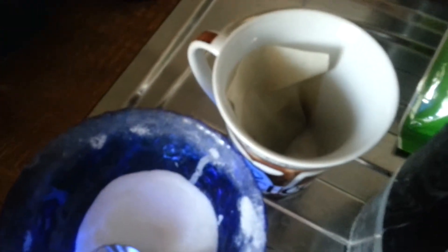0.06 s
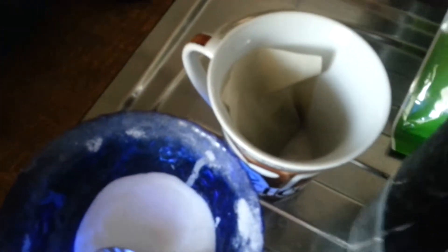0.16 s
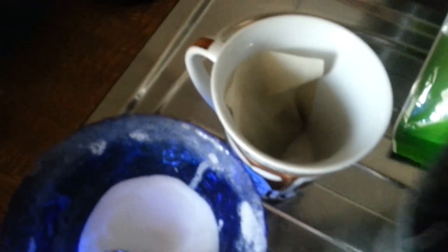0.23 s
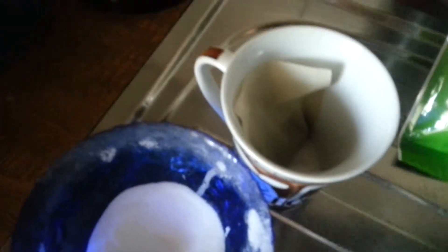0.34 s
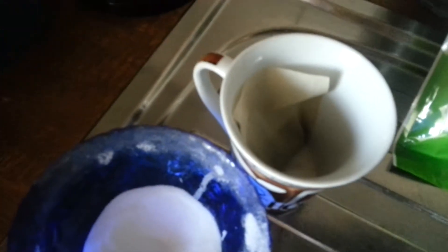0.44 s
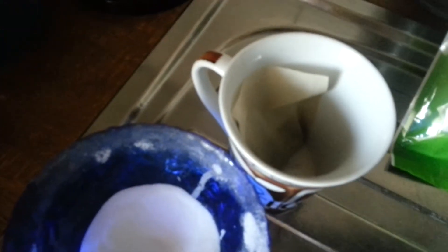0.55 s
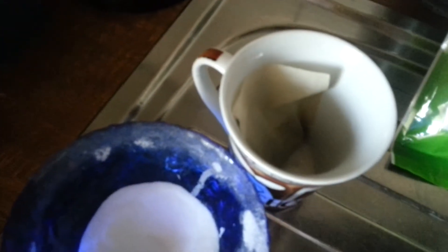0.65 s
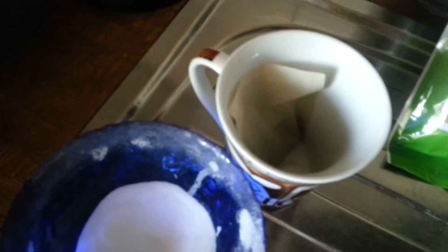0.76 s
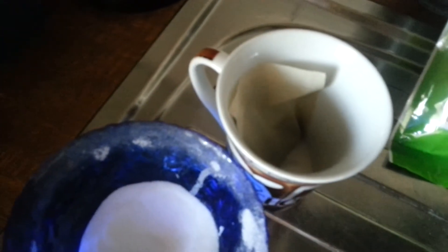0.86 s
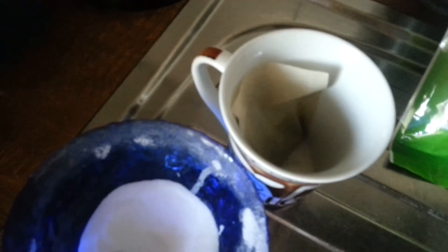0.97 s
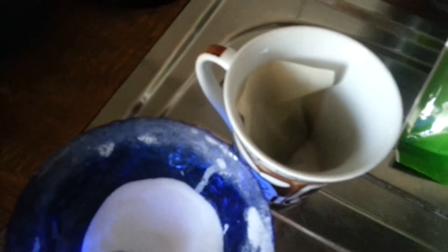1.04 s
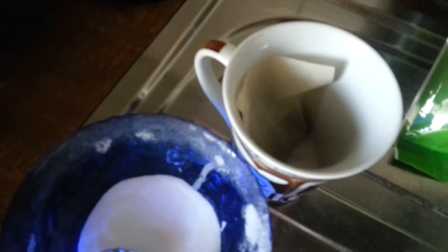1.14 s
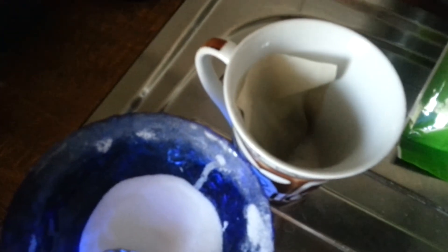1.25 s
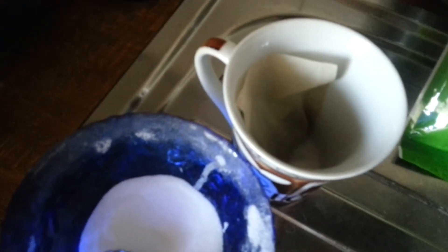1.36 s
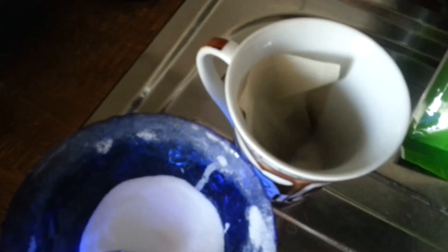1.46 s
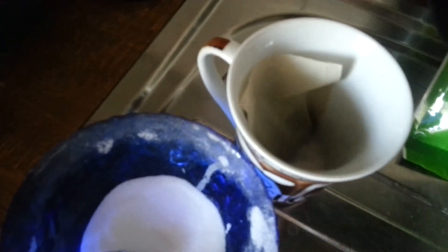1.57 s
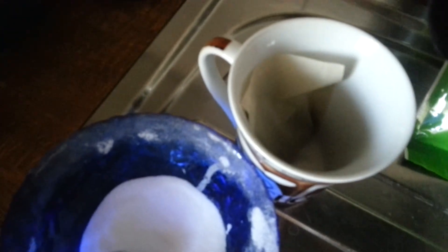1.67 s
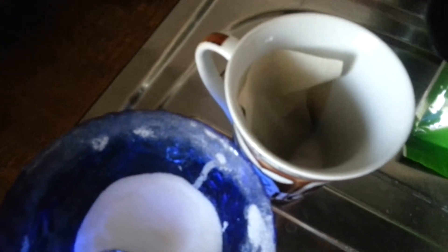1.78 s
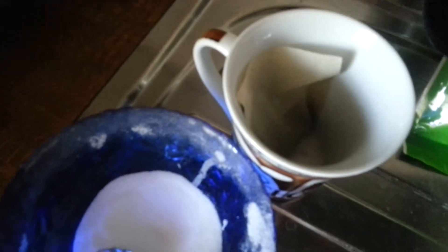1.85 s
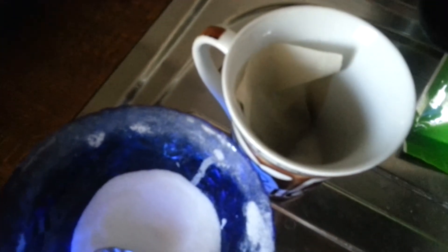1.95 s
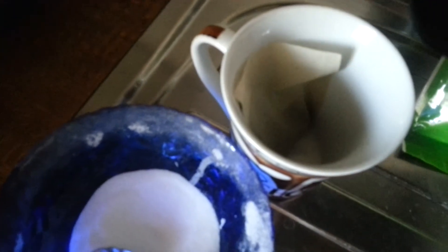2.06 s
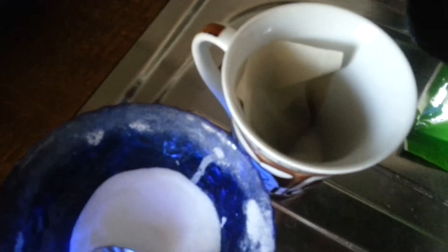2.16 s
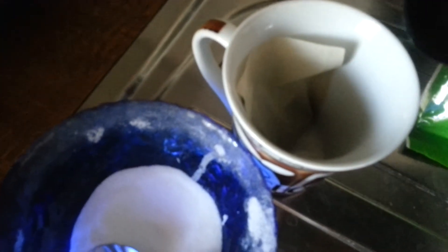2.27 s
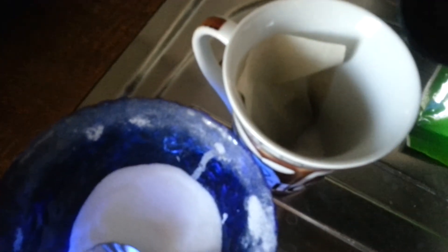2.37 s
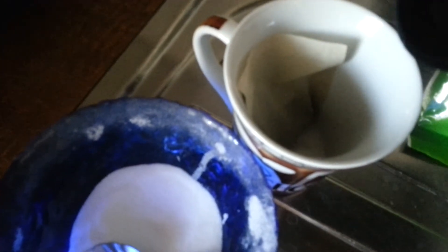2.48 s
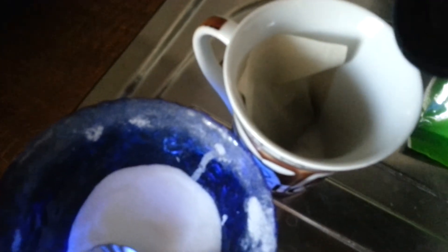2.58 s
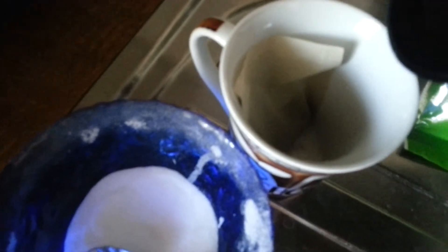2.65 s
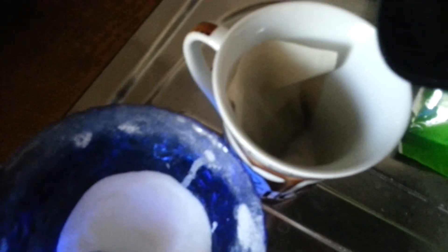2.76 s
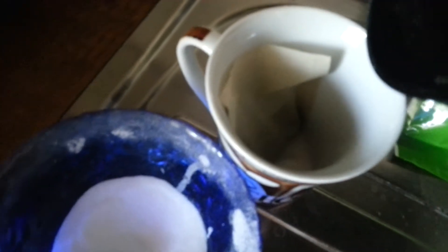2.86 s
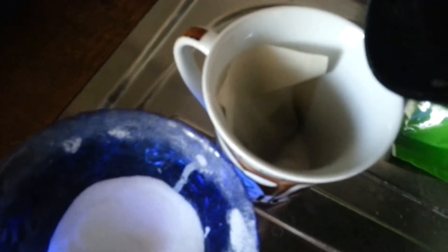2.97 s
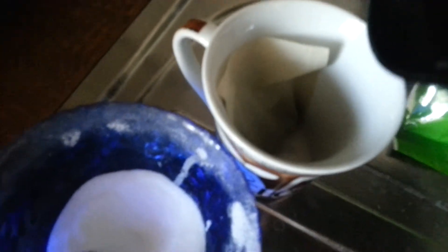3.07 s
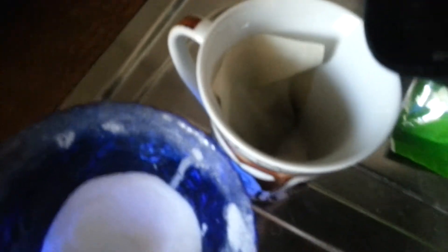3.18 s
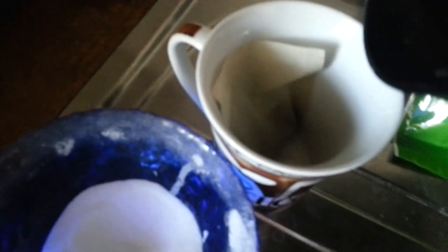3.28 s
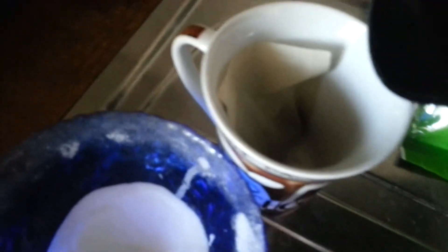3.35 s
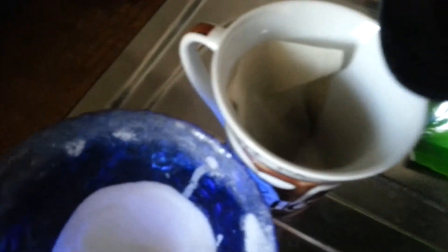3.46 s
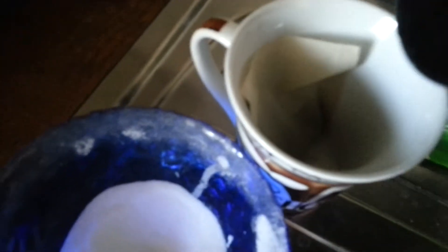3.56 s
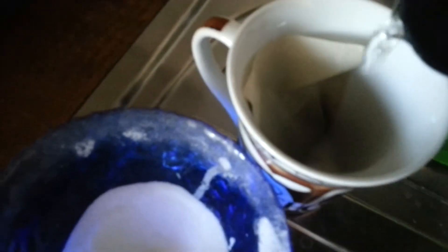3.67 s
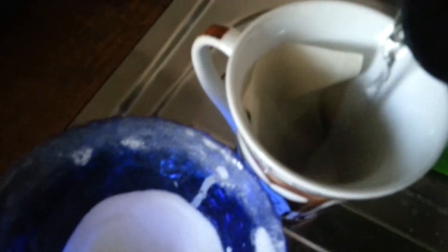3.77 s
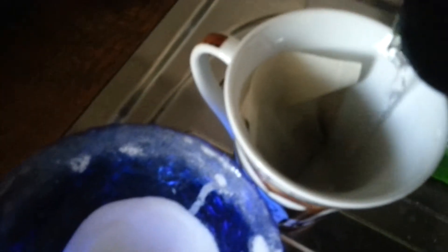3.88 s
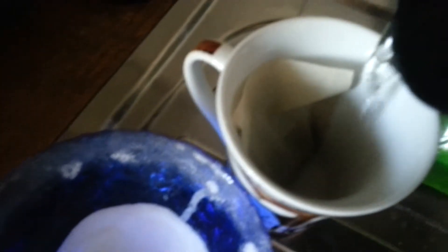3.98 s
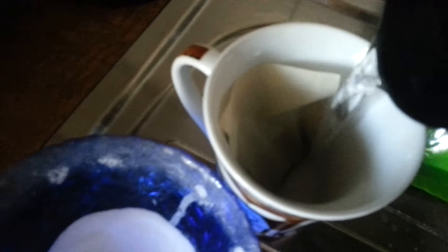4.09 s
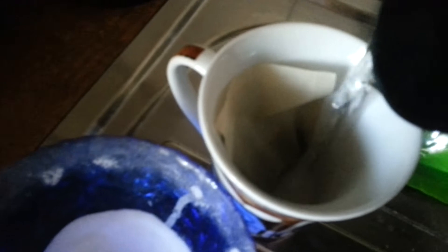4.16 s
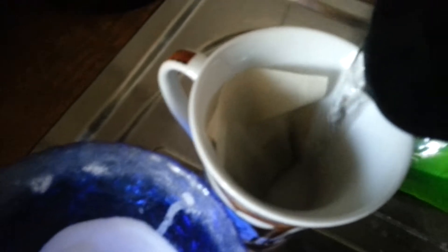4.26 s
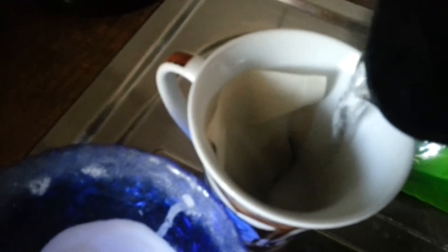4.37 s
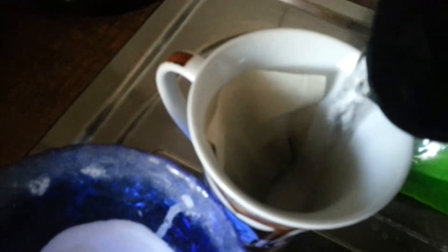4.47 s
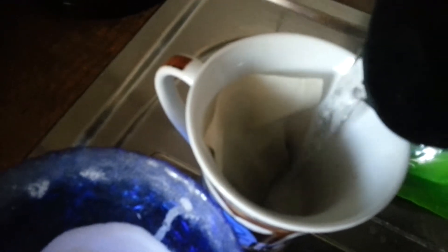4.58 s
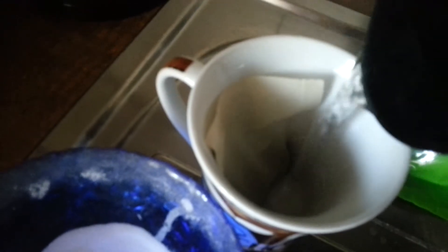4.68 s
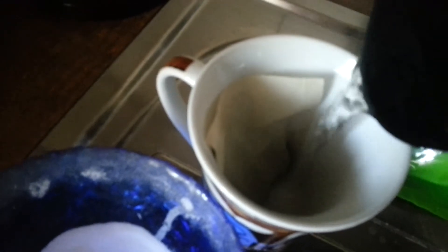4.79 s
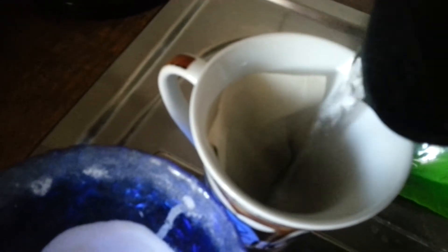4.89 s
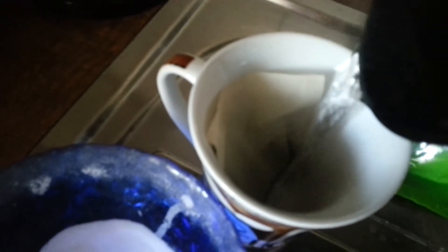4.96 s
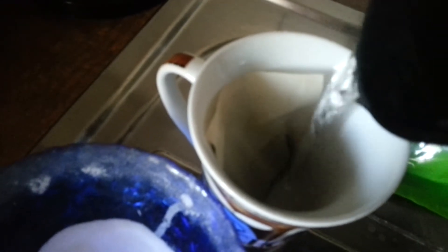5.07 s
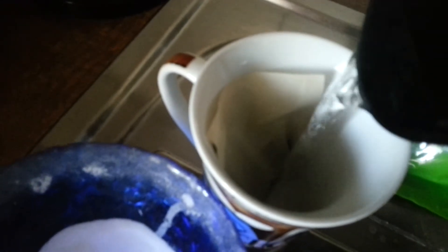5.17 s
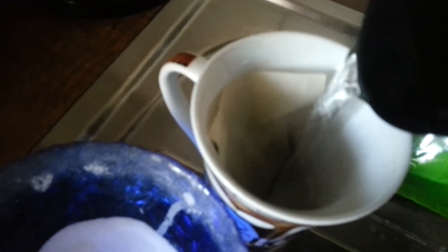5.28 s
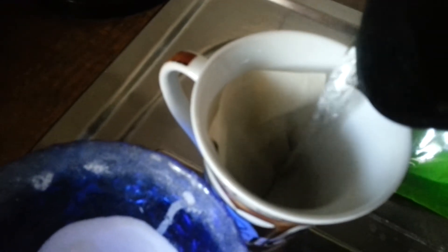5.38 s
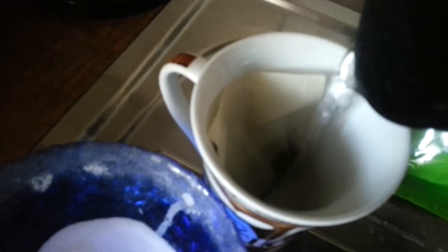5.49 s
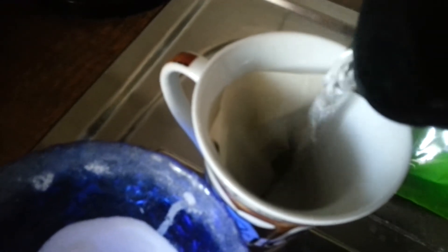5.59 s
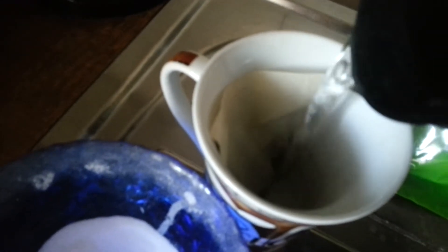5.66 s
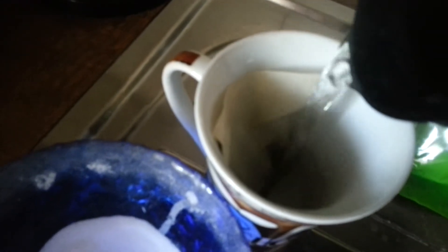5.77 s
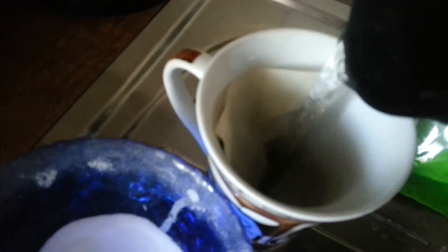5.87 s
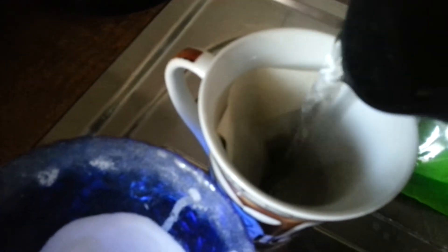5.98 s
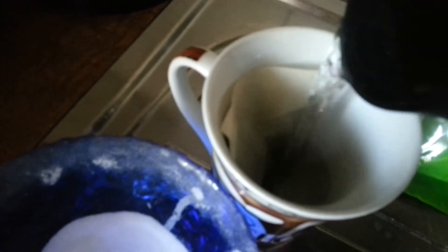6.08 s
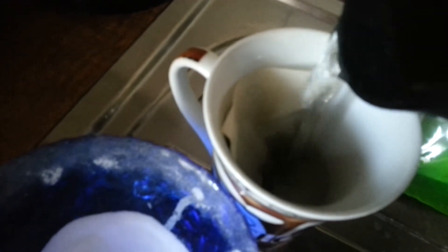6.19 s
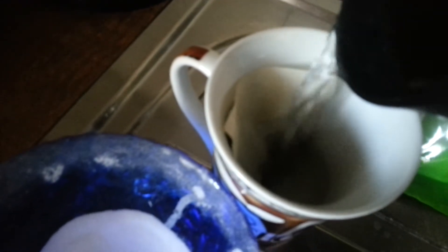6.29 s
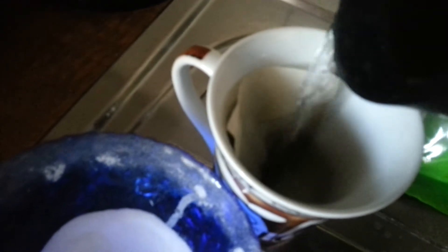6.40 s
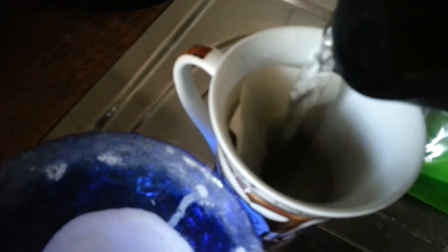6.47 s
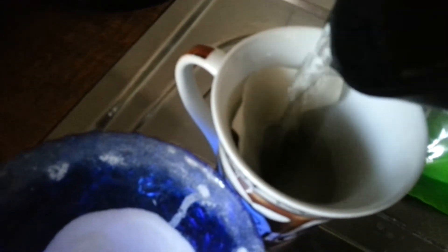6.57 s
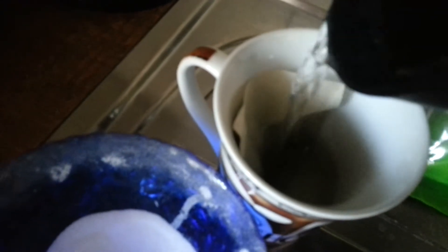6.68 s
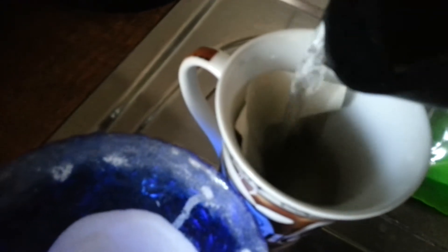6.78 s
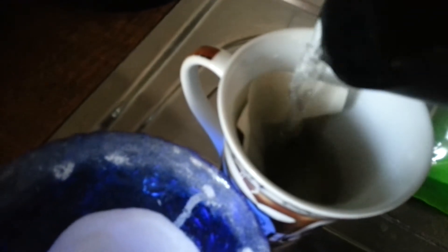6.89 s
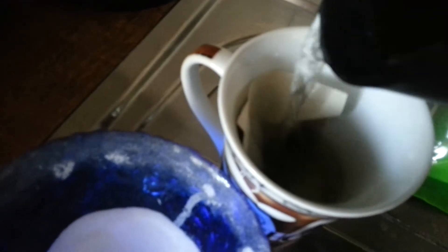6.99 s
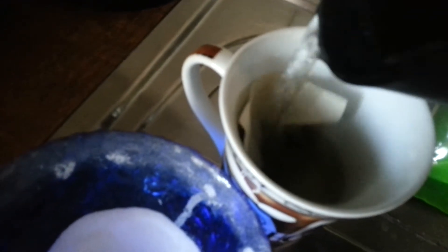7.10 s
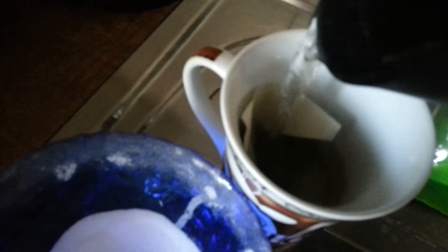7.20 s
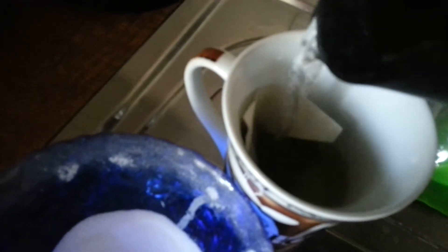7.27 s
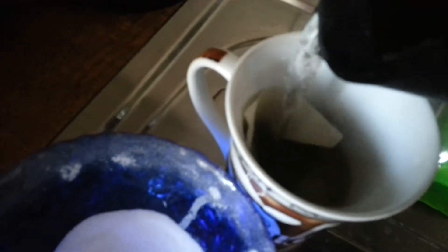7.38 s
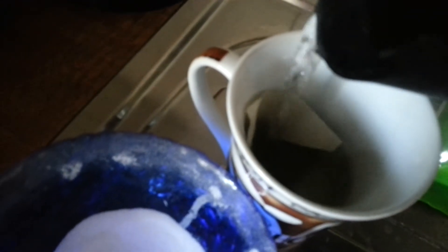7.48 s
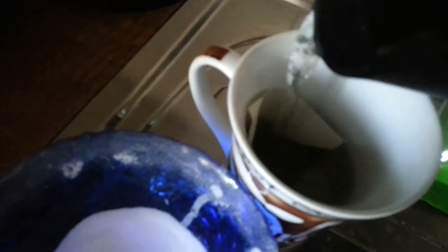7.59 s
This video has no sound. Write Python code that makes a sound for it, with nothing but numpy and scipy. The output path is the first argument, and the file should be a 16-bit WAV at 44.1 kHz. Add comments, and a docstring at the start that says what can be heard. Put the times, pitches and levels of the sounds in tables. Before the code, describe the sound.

A close handheld stereo microphone in a small, quiet kitchen. At 0 s a hot kettle rumbles and rushes; light touches lead to a hard hollow plastic clunk with rattling around 0.2 s and a brief scrape at 0.3 s. The simmer dies away within about a second, with a very faint squeak near 0.7 s and a soft swill at 1 s. Lone knocking pops and dry ticks become sparser until 3.6 s, one stronger at 2.7 s. At 3.8 s water reaches the ceramic mug, right of centre, in bright, uneven splashes and fizz. From 4.7 s it runs fuller; by 5.4 s a pool forms, hollow plops and gurgling mix with the splashes, and the mug's note slowly rises. The flow weakens after 6.5 s, with low glugs near 6.6, 6.95 and 7.5 s, then strengthens again at the end, still pouring. Steel board resonance and short reflections surround it.

```python
"""A hot electric kettle is lifted with a hollow clunk; its rushing simmer dies away and it ticks as it cools.
Then water runs down the wall of a ceramic mug onto a tea bag: every splash ticks, traps a small bubble and
rings the air in the mug, whose note rises as it fills; air glugs from under the tea bag.
A small kitchen, heard by the stereo microphones of a hand-held camera just left of the mug."""
import sys
import numpy as np
from scipy import signal
from scipy.fft import rfft, irfft, next_fast_len
from scipy.io import wavfile

SR = 44100
rng = np.random.default_rng(int(sys.argv[2]) if len(sys.argv) > 2 else 0)


def to_wav(sig):
    """Store sig (one row per channel, or 1-D mono) as 16-bit WAV at the path in sys.argv[1].

    Samples outside -1..1 are clipped; the rate is SR.
    """
    pcm = np.clip(np.atleast_2d(sig), -1, 1) * 32767
    pcm = np.round(pcm).astype(np.int16)
    wavfile.write(sys.argv[1], SR, pcm.T)  # frames by channels


N = 336919
TIME = np.arange(N) / SR
RING = np.arange(8192) / SR  # time axis of a ring, 0.19 s
SHORT = np.arange(2048) / SR  # time axis of a splash or pop, 0.046 s

# strength of the stream as the kettle is tipped more or less: start_s, level_db
STREAM_LEVEL = [(3.779, -50), (4.0, -59.5), (4.25, -47.5), (4.55, -50), (4.8, -43), (5.7, -42.5),
                (5.92, -46), (6.15, -42.5), (6.77, -54.5), (6.921, -48.5), (7.3, -56.5), (7.63, -43.5)]

POUR_S, POOL_S = 3.78, 5.44  # the first water arrives; the soaked tea bag lets a pool form
EMPTY_HZ, RISE_HZ_PER_S = 908, 43  # the air in the mug, shorter as it fills
AIR_T60_S = .016  # of the air in the mug and of the air above the kettle's water
DROP_HZ = 2370  # bubble pitch of a middling drop
THUMP_DB_PER_OCT, TICK_DB_PER_OCT = -3, -1  # a smaller drop rings higher; both fall, the thump faster
TICK_DB = -12  # impact tick over bubble, for a middling drop
TICK_TOP_HZ = 9100  # the brightest tick, on bare glaze
TOP_HZ = 14700  # the camera's treble limit
RUMBLE_DB, RUMBLE_FALL_DB_PER_S = -43, 23.5  # the simmer dies once the heat is off
RUSH_DB, RUSH_FALL_DB_PER_S = -47, 11
SWILL_S, SWILL_LENGTH_S, SWILL_DB = 1, 0.14, -57.5  # water swills over the element as the kettle is carried
TIPPING_S, TIPPED_RUMBLE_DB = 0.32, -62.5  # the water takes this long to shift
REST_RUSH_DB, TIPPED_RISE_DB_PER_S = -63, 2  # the rush lingers, and revives as the kettle tips


def undb(db):
    """Decibels to gain."""
    return 10 ** (np.asarray(db) / 20)


def curves(table, t=TIME):
    """The columns of a table of timed rows, joined by straight lines."""
    s, *columns = np.transpose(table)
    return [np.interp(t, s, c) for c in columns]


def unit(x):
    """Scale to rms 1."""
    return x / np.sqrt(np.mean(x ** 2))


def fade(t, t60):
    """Exponential decay, 60 dB in t60 seconds."""
    return np.exp(-np.log(1000) * t / t60)


def add(out, s, sound):
    """Mix a sound into a track at s seconds."""
    i = int(np.clip(s * SR, 0, N - 1))
    out[..., i:i + sound.shape[-1]] += sound[..., :N - i]


def colour(x, points):
    """Shape a noise with a (Hz, dB) spectrum; rms 1."""
    n = x.shape[-1]
    size = next_fast_len(n)
    hz, db = np.transpose(points)
    f = np.maximum(np.fft.rfftfreq(size, 1 / SR), 1)
    gain = undb(np.interp(np.log(f), np.log(hz), db))
    gain = gain * np.minimum(f / hz[0], 1)  # falls away below the first point
    return unit(irfft(rfft(x, size) * gain, size)[..., :n])


def highpass(x, hz, order=2):
    """Take out what lies under hz."""
    return signal.sosfilt(signal.butter(order, hz, "high", fs=SR, output="sos"), x)


def spread(pair, wide_hz):
    """Two unrelated signals to left and right: partly alike in the upper bass, unrelated above wide_hz."""
    band = signal.butter(1, [100, max(wide_hz, 200)], "bandpass", fs=SR, output="sos")
    side = pair[1] - .7 * signal.sosfilt(band, pair[1])
    return unit(np.array([pair[0] + side, pair[0] - side]))


def pan(x, right_db):
    """Make the right side louder than the left by right_db."""
    return x * undb(np.array([[-right_db], [right_db]]) / 2)


def grains(rate, scatter_db):
    """Two unrelated trains of dense clicks of very uneven size, rate per second."""
    size = undb(scatter_db * np.minimum(rng.exponential(size=(2, N)), 4))
    clicks = rng.random((2, N)) < rate / SR
    return clicks * size * rng.standard_normal((2, N))


def resonate(x, modes):
    """What a set of (Hz, t60, dB) modes picks out of a stereo sound."""
    response = np.zeros(len(RING))
    for hz, t60, db in modes:
        peak = undb(db) * 2 * np.log(1000) / (t60 * SR)  # narrow modes would otherwise come out louder
        response += peak * np.cos(2 * np.pi * hz * RING) * fade(RING, t60)
    return signal.fftconvolve(x, response[None], axes=1)[:, :N]


def bubble(hz, cycles, glide):
    """A trapped bubble rings for a few cycles, its pitch creeping up by the share glide."""
    age = SHORT * hz / cycles
    phase = 2 * np.pi * hz * np.cumsum(1 + glide * np.minimum(age, 1)) / SR
    return np.sin(phase) * fade(age, 0.73)


def simmer_levels():
    """Gains of rumble and rush: both fade with the heat; tipping washes water over the hot element again."""
    tipped_s = np.maximum(TIME - POUR_S, 0)
    cooling_rumble = undb(RUMBLE_DB - RUMBLE_FALL_DB_PER_S * TIME)
    tipped_rumble = undb(TIPPED_RUMBLE_DB) * np.minimum(tipped_s / TIPPING_S, 1)
    swill = undb(SWILL_DB) * np.exp(-((TIME - SWILL_S) / SWILL_LENGTH_S) ** 2)
    rumble = np.hypot(np.hypot(cooling_rumble, tipped_rumble), swill)
    cooling_rush = undb(RUSH_DB - RUSH_FALL_DB_PER_S * TIME)
    rush = np.hypot(cooling_rush, undb(REST_RUSH_DB + TIPPED_RISE_DB_PER_S * tipped_s))
    return rumble, rush


def simmer(lumps_db=1.5, hollow_hz=915, hiss_db=-10):
    """Steam bubbles collapse in flurries: a rumble in the water, a rush in the walls, a hollow note; steam hisses."""
    # colour of the rumble in the water: pitch_hz, level_db
    rumble_colour = [(100, -60), (170, 1.5), (235, -3), (350, 7), (520, -6.5), (700, 0.5), (2000, -79)]
    # colour of the rush in the walls: pitch_hz, level_db
    rush_colour = [(300, -34), (800, -6.5), (1700, -13), (2700, -16.5), (4200, -19.5), (7000, -34)]
    # once off its base, the air above the water sings along: start_s, level_db
    hollow_level = [(.33, -43.5), (.72, -54.5), (.9, -102)]
    rumble, rush = simmer_levels()
    beats = np.arange(0, N / SR, 1 / 40)  # seconds
    flurry = undb(lumps_db * np.interp(TIME, beats, rng.standard_normal(len(beats))))
    low = spread(colour(grains(rate=680, scatter_db=3.0), rumble_colour), 540) * rumble
    collapses = spread(colour(grains(rate=2400, scatter_db=-1.5), rush_colour), 640)
    hollow = unit(resonate(collapses, [(hollow_hz, AIR_T60_S, 0)]))
    hollow = hollow * undb(curves(hollow_level)[0]) * (TIME > hollow_level[0][0])
    hiss = undb(hiss_db) * highpass(rng.standard_normal((2, N)), 5500)
    return flurry * low + hollow + pan((flurry * collapses + hiss) * rush, 3.9)


def knocks(rattle_db=-6, rattle_t60=0.082, give_s=0.00021, low_hz=150):
    """Each contact rings the water-filled body and rattles the plastic; the foot scrapes as it leaves the base."""
    # kettle against its base, and its handle and lid: start_s, level_db, rattle_db (relative to the knock)
    contacts = [(.013, -44, 14), (.112, -39, -16.5), (.1715, -26, -2.5), (0.1754, -22.5, 2),
                (.1797, -21.5, -8), (.1826, -13, -5), (.198, -25, 0.5), (0.2156, -29, 5), (.288, -31, -8),
                (2.682, -46.5, 9.5), (4.1519, -45.5, 17)]
    # what the kettle's body rings with: pitch_hz, t60_s, level_db
    body_modes = [(123.4, 0.34, -24), (243, 0.32, -22.5), (441.5, 0.15, -15.5), (554, 0.067, -9),
                  (702, 0.065, 0.5), (820, 0.09, -13.5), (1170, 0.11, -15), (2940, 0.026, -24)]
    # colour of its plastic parts rattling and scraping: pitch_hz, level_db
    rattle_colour = [(150, -4), (900, 1.5), (1600, 5.5), (2700, -0.5), (3700, -8), (6000, -22),
                     (15000, -38)]
    # the kettle drags off its base: start_s, level_db
    scrape_level = [(.225, -52), (.278, -30.5), (.296, -32), (.315, -38.5), (.34, -54)]
    body = sum(undb(db) * np.sin(2 * np.pi * hz * RING) * fade(RING, t60) for hz, t60, db in body_modes)
    loose = fade(RING, rattle_t60) * (1 - np.exp(-RING / give_s))  # the plastic gives before it rattles
    thud, shake = np.zeros(N), np.zeros(N)
    for s, db, loose_db in contacts:
        add(thud, s, undb(db) * body)
        add(shake, s, undb(db + loose_db + rattle_db) * loose)
    dragging = (TIME > scrape_level[0][0]) * (TIME < scrape_level[-1][0])
    drag = undb(curves(scrape_level)[0]) * dragging
    rattle = spread(colour(rng.standard_normal((2, N)), rattle_colour), 850) * (shake + drag)
    return highpass(thud + pan(rattle, 4.2), low_hz, order=4)


def plops(count=60, start_s=.33, mean_s=.42, first_db=-35, fall_db_per_s=10, scatter_db=3.0, hz=1150,
          pitch_spread=.5):
    """Lone collapses grow rarer and weaker as the lifted kettle cools; rows of start_s, level_db, pitch_hz."""
    age = rng.exponential(mean_s, count)
    size, pitch = rng.standard_normal((2, count))
    db = first_db - fall_db_per_s * age + scatter_db * size
    return np.column_stack([start_s + age, db, hz * np.exp(pitch_spread * pitch)])


def pops(crack_db=-10, length_s=.03):
    """Short pitched knocks with a dry crack: the last lone collapses of steam, and once the kettle's body under
    a knock."""
    # the loudest ticks of the hot kettle, mostly steam bubbles collapsing; the row at 2.682 s is the body
    # ringing under a knock: start_s, level_db, pitch_hz
    loud_ticks = [(.53, -33, 1780), (0.832, -40, 1720), (1.082, -35, 1630), (1.355, -41, 1650),
                  (1.421, -38, 725), (1.452, -35.5, 754), (1.739, -42, 1580), (1.851, -37.5, 784),
                  (2.028, -37.5, 1610), (2.213, -36, 760), (2.604, -40.5, 1380), (2.682, -30, 1000),
                  (3.299, -43, 1730), (3.607, -43.5, 1700)]
    # colour of their dry crack: pitch_hz, level_db
    crack_colour = [(250, -20.5), (750, -3), (1200, -6.5), (1700, 0), (2700, -11.5), (4500, -25),
                    (15000, -24)]
    out = np.zeros((2, N))
    for s, db, hz in np.vstack([loud_ticks, plops()]):
        crack = spread(colour(rng.standard_normal((2, len(SHORT))), crack_colour), 900)
        crack = crack * fade(SHORT, length_s)
        knock = .5 * bubble(hz, hz * length_s, 0)  # steady pitch
        add(out, s, undb(db) * (knock + undb(crack_db) * crack))
    return pan(out, 3.1)


def squeak(at_s=0.684, length_s=0.077, hz=4230, t60=0.011, db=-61):
    """The plastic handle squeaks faintly as it takes the weight: noise rubbed through one narrow resonance."""
    rub = unit(resonate(rng.standard_normal((2, N)), [(hz, t60, 0)]))
    return undb(db) * rub * np.exp(-((TIME - at_s) / length_s) ** 2)


def droplets(count=720, drop_db=-1.5, scatter_db=6.0, pitch_hz=2200, glance_oct_per_db=0.24,
             pitch_spread=0.53, small_db_per_oct=-4.5, thinning=0.6, thump_db=1):
    """The small splashes of the running stream: rows of start_s, bubble_db, pitch_hz, thump_db."""
    # how squarely the stream plunges into the pool instead of glancing off wall or tea bag:
    # start_s, plunge_db (air thump over bubble, before thump_db and drop size)
    plunge_curve = [(3.8, -5), (4.9, -5), (5.33, 0.5), (6.3, 4.5), (7.2, -0.5), (7.63, -5)]
    s = np.linspace(POUR_S, STREAM_LEVEL[-1][0], count) + rng.normal(0, .008, count)
    flow, plunge = curves(STREAM_LEVEL, s)[0], curves(plunge_curve, s)[0]
    size = scatter_db * np.minimum(rng.exponential(size=count), 2)
    # a weak stream breaks into fewer, separate drops
    share = undb((flow - flow.max()) * thinning)
    falls = rng.random(count) < share
    # a glancing stream traps smaller, higher bubbles; among its drops the smallest are the weakest
    small = pitch_spread * rng.standard_normal(count)
    hz = np.clip(pitch_hz * np.exp(small) * 2 ** (-glance_oct_per_db * plunge), 1300, 9000)
    fewer_db = -10 * np.log10(share)  # fewer drops, each stronger
    db = flow + drop_db + size + fewer_db + small_db_per_oct * small / np.log(2)
    thump = db + thump_db + plunge + THUMP_DB_PER_OCT * np.log2(hz / DROP_HZ)
    return np.column_stack([s, db, hz, thump])[falls]


def impact(s, hz, centre_hz=8600, follows=0.2, dull_oct_per_s=0.17, pitch_spread=0.42, sharpness=1.16,
           t60=0.0068, trail_db=-17, trail_t60=0.16):
    """A drop lands: a short burst and a trail of mist, brighter if small, duller as water covers the glaze."""
    centre = centre_hz * (hz / DROP_HZ) ** follows * 2 ** (-dull_oct_per_s * (s - POUR_S))
    centre *= np.exp(pitch_spread * rng.standard_normal())
    level = fade(SHORT, t60) + undb(trail_db) * fade(SHORT, trail_t60)
    burst = rng.standard_normal((2, len(SHORT))) * level
    peak = signal.iirpeak(min(centre, TICK_TOP_HZ, TOP_HZ), max(sharpness, 1), fs=SR)
    return signal.lfilter(*peak, burst)


def pour(air_db=0, bubble_db=1, ring_s=.005, ring_spread=0.23, glide=0.072, swell_s=0.00056,
         tick_low_hz=2500, overtone_scatter_db=4):
    """Every splash ticks on impact, traps a bubble, thumps the air in the mug and rings its overtones."""
    # the biggest splashes in the mug: start_s, bubble_db (before the keyword), pitch_hz (of the
    # trapped bubble), thump_db (of the air)
    big_splashes = [(3.811, -40, 1280, -30.5), (3.8724, -18.5, 3880, -58), (3.8871, -26.5, 1750, -31.5),
                    (3.905, -30.5, 1620, -36), (4.095, -26, 2700, -41), (4.152, -26, 3660, -57),
                    (4.2883, -23, 8040, -56), (4.338, -35, 4400, -55), (4.4036, -20, 1400, -25),
                    (4.4202, -28, 2630, -59), (4.4727, -29.5, 2540, -38), (4.5381, -30.5, 8600, -61),
                    (4.608, -24.5, 2540, -30.5), (4.6183, -21.5, 2520, -47), (4.6312, -30, 2380, -36),
                    (4.647, -21, 1820, -16.5), (4.6819, -25, 2100, -31), (4.7429, -26, 1800, -19),
                    (4.758, -18, 2090, -43), (4.7711, -28, 2630.0, -26.5), (4.798, -26.5, 2430, -24),
                    (4.825, -25.5, 2840, -37), (4.832, -42, 1900, -23), (4.8451, -33, 1500, -32),
                    (4.8543, -14, 1500, -21.5), (4.88, -23.5, 2170, -20.5), (4.9674, -26.5, 2210, -30),
                    (5.0052, -20, 2300, -27.5), (5.0325, -27, 2300.0, -25.5), (5.0576, -26, 2050, -27),
                    (5.0682, -27.5, 2530, -44), (5.112, -35, 8800, -50), (5.1494, -23.5, 2060.0, -30),
                    (5.1825, -19.5, 2290, -26.5), (5.1936, -25.5, 1680.0, -20), (5.2246, -26, 2270, -25),
                    (5.255, -24.5, 1630.0, -19), (5.281, -32, 1900, -21), (5.3143, -30, 1770.0, -19),
                    (5.327, -32, 2080, -11), (5.347, -42, 2100, -41), (5.3861, -40, 1940, -16.5),
                    (5.426, -40, 2020.0, -22), (5.4459, -27, 2520, -19.5), (5.4839, -39, 2050.0, -13.5),
                    (5.499, -29.5, 2690, -18), (5.5233, -28, 2030.0, -12.5), (5.5551, -23, 1530, -15.5),
                    (5.5829, -22, 1770, -20), (5.6154, -24, 1930, -12), (5.646, -31, 2200, -26),
                    (5.6677, -33.5, 2480, -16), (5.685, -21, 2500, -9), (5.7178, -22, 1990, -13.5),
                    (5.757, -27, 2170, -19.5), (5.8104, -26.5, 1630.0, -23), (5.8288, -35, 2110, -14.5),
                    (5.997, -33.5, 1650, -27), (6.029, -31, 1980, -22), (6.1101, -23, 2140, -14),
                    (6.1325, -28, 2360, -20), (6.1564, -24.5, 1910, -12.5), (6.177, -46, 1800, -24),
                    (6.2385, -34, 1550.0, -19.5), (6.3358, -27, 1720.0, -17), (6.3759, -28, 2640, -43),
                    (6.4327, -32.5, 2060.0, -21.5), (6.5525, -27, 1930, -23.5),
                    (6.5709, -30.5, 2520, -23.5), (6.6171, -30, 2530, -28), (6.6615, -24, 2220, -24),
                    (6.8505, -33.5, 2660, -21.5), (6.8805, -26.5, 1750, -19), (6.9365, -25, 1520, -25.5),
                    (7.4165, -31, 2662, -34), (7.5048, -27, 2080, -23.5), (7.5827, -20.5, 2070, -27),
                    (7.6134, -21, 1530, -23.5)]
    # the higher resonances of the air in the mug: pitch_hz, t60_s, level_db (before scatter)
    overtone_modes = [(1580, 0.021, -12), (2237, 0.017, -18), (2740, 0.013, -17), (4165, 0.01, -21.5)]
    # big splashes land mid-pool and sound the mug's note true, small ones stray:
    # thump_db, pitch_scatter (share of the pitch)
    slosh_curve = [(-30, .085), (-19, .025)]
    air, bubbles, ticks = np.zeros((3, 2, N))
    for s, db, hz, thump_db in np.vstack([big_splashes, droplets()]):
        mug_hz = EMPTY_HZ + RISE_HZ_PER_S * (s - POUR_S)
        slosh = np.interp(thump_db, *np.transpose(slosh_curve))
        mug_hz *= 1 + slosh * rng.standard_normal()  # the surface sloshes
        ring = np.sin(2 * np.pi * mug_hz * SHORT) * fade(SHORT, AIR_T60_S) * (1 - np.exp(-SHORT / swell_s))
        # which overtones answer depends on where the drop lands
        overtones = np.zeros(len(SHORT))
        for mode_hz, t60, mode_db in overtone_modes:
            gain = undb(mode_db + overtone_scatter_db * rng.standard_normal()) * rng.choice([-1, 1])
            overtones += gain * np.sin(2 * np.pi * mode_hz * SHORT) * fade(SHORT, t60)
        # bubbles ring for unequal times; the smallest hardly stir the overtones
        cycles = hz * ring_s * np.exp(ring_spread * rng.standard_normal())
        plink = bubble(hz, cycles, glide) + overtones * min(DROP_HZ / hz, 1) ** 2
        # the left microphone is further away, by more or less as the splash moves
        lag_s = rng.normal(.00007, .00004)
        for side, arrival in enumerate([s + lag_s, s]):
            add(air[side], arrival, undb(thump_db + air_db) * ring)
            add(bubbles[side], arrival, undb(db + bubble_db) * plink)
        tick_db = db + TICK_DB + TICK_DB_PER_OCT * np.log2(hz / DROP_HZ)
        add(ticks, s, undb(tick_db) * impact(s, hz))
    return highpass(air, 83, order=4) + highpass(bubbles, 1310) + highpass(ticks, tick_low_hz)


def spray(count=110, over_stream_db=-1, scatter_db=5, hz=5000, fizz_db=-23):
    """Fine spray flicks against the dry glaze above the water, over the even fizz of the stream."""
    fizz = undb(curves(STREAM_LEVEL)[0] + fizz_db) * (TIME > POUR_S)
    out = highpass(rng.standard_normal((2, N)), hz) * fizz
    starts = rng.uniform(POUR_S, STREAM_LEVEL[-1][0], count)
    for s, size in zip(starts, np.minimum(rng.exponential(size=count), 2)):
        db = curves(STREAM_LEVEL, s)[0] + over_stream_db + scatter_db * size
        add(out, s, undb(db) * impact(s, hz))
    return out


def gurgle(count=80, over_stream_db=4, scatter_db=3, hz=700, pitch_spread=0.19, cycles=16):
    """Once there is a pool, the stream churns bigger bubbles into it, each with its own low pitch."""
    out = np.zeros(N)
    starts = rng.uniform(POOL_S, STREAM_LEVEL[-1][0], count)
    for s, (size, pitch) in zip(starts, rng.standard_normal((count, 2))):
        db = curves(STREAM_LEVEL, s)[0] + over_stream_db + scatter_db * size
        add(out, s, undb(db) * bubble(hz * np.exp(pitch_spread * pitch), cycles, .1))
    return out


def glugs(cycles=18):
    """Pockets of air escape from under the soaked tea bag with a low plop, amid the gurgle."""
    # low plops of air: start_s, level_db, pitch_hz
    air_pockets = [(6.626, -38.5, 460), (6.949, -41.5, 405), (6.992, -40.5, 438), (7.51, -43, 376)]
    out = gurgle()
    for s, db, hz in air_pockets:
        add(out, s, undb(db) * bubble(hz, cycles, .1))
    return highpass(out, 250)


def echo(x, t60, delay_s, points, wide_hz):
    """Diffuse reflections that begin after delay_s and die in t60; keeps the energy."""
    t = np.arange(SR // 2) / SR
    tail = spread(colour(rng.standard_normal((2, len(t))), points), wide_hz)
    tail = tail * fade(t, t60) * (t > delay_s)
    tail /= np.sqrt(np.sum(tail ** 2, axis=1, keepdims=True))
    return signal.fftconvolve(np.atleast_2d(x), tail, axes=1)[:, :N]


def shifting_echo(x, t60, delay_s, points, wide_hz, size=16384):
    """Quick reflections whose paths keep changing as kettle, stream and camera move."""
    out, window = np.zeros((2, N)), signal.get_window("hann", size)
    # overlapping pieces, each with an echo of its own
    for i in range(int(POUR_S * SR) - size, N, size // 2):
        piece = x[:, i:i + size]
        add(out, i / SR, echo(piece * window[:piece.shape[1]], t60, delay_s, points, wide_hz))
    return out


def scene(near_db=-11, water_room_db=-14, kettle_room_db=-16, floor_db=-58, board_db=10, mouth_hz=520):
    """Kettle and mug on a steel draining board, which thrums and reflects at once; the kitchen answers later."""
    # the steel draining board under the mug: pitch_hz, t60_s, level_db (before board_db)
    board_modes = [(366, 0.21, 8), (433, 0.093, 4.5), (532, 0.044, -4)]
    # colour of the kitchen's echo: pitch_hz, level_db
    room_colour = [(150, -18), (370, 7.5), (1000, -1), (3000, -0.5), (15000, -22)]
    # colour of the quiet kitchen and microphone hiss: pitch_hz, level_db (relative)
    floor_colour = [(25, -18.5), (95, -5), (200, -10), (450, -11), (900, -22), (1350, -17.5), (2500, -22.5),
                    (6000, -25), (14500, -24)]
    water = pour() + spray()
    kettle = knocks() + pops() + squeak()
    # a deeper pool passes more of the water's sound down to the steel
    board_share = 0.13 + 0.68 * np.maximum(TIME - POOL_S, 0)
    board = undb(board_db) * resonate(water * board_share, board_modes)
    # reflections from the draining board and the dishes die quickly
    near_colour = [(1000, 0), (2700, -3), (4300, 6), (15000, -16)]  # (Hz, dB)
    near = shifting_echo(water, 0.028, 0.0025, near_colour, 1600)
    water_room = echo(water, 0.41, 0.0069, room_colour, 1300)
    kettle_room = echo(kettle, 0.38, 0.0035, room_colour, 700)
    floor = spread(colour(rng.standard_normal((2, N)), floor_colour), 180)
    reflections = pan(undb(near_db) * near, 9.5)
    reflections = reflections + undb(water_room_db) * water_room + undb(kettle_room_db) * kettle_room
    # the mug's small mouth radiates little below mouth_hz; it stands right of the camera
    mug = pan(highpass(water, mouth_hz), 7.5) + pan(board + glugs(), 5.0)
    return mug + kettle + simmer() + reflections + undb(floor_db) * floor


def record(dry, bass_hz=105, duck_db=-8, threshold_db=-42, average_s=0.095):
    """The camera turns the deep bass down while the sound is loud, and cuts the top."""
    keep = np.exp(-1 / (average_s * SR))
    power = signal.lfilter([1 - keep], [1, -keep], np.mean(dry ** 2, axis=0))
    gain = undb(duck_db * power / (power + undb(threshold_db) ** 2))  # half of duck_db at the threshold
    bass = signal.sosfiltfilt(signal.butter(2, bass_hz, fs=SR, output="sos"), dry)
    top_cut = signal.ellip(10, .1, 60, TOP_HZ, fs=SR, output="sos")
    return signal.sosfiltfilt(top_cut, dry - (1 - gain) * bass)


dry = scene()
out = record(dry)
to_wav(out)
```